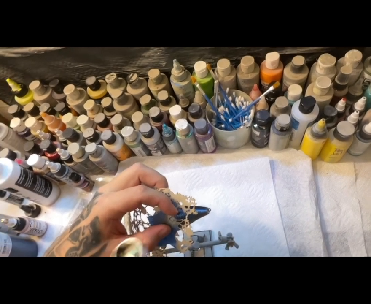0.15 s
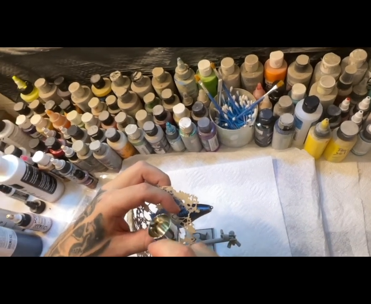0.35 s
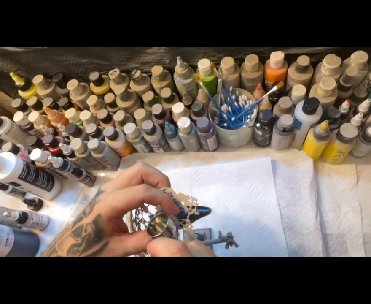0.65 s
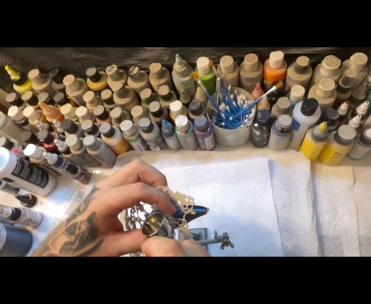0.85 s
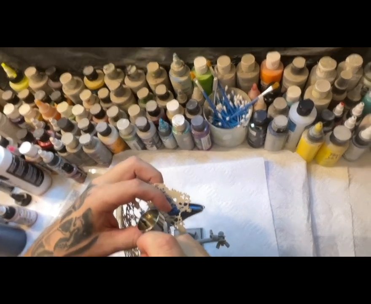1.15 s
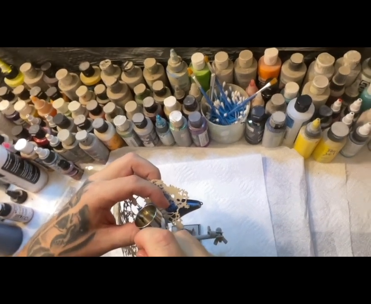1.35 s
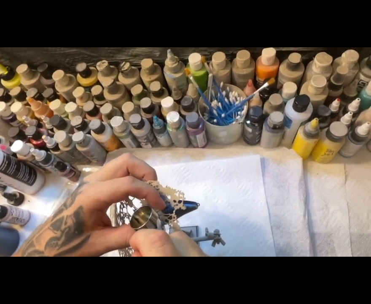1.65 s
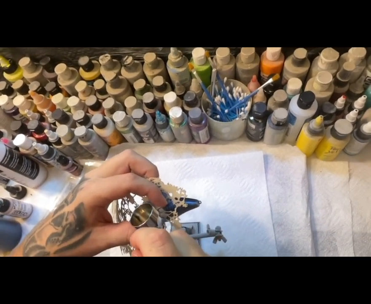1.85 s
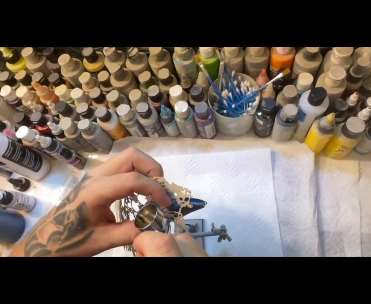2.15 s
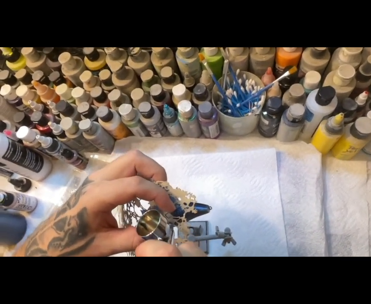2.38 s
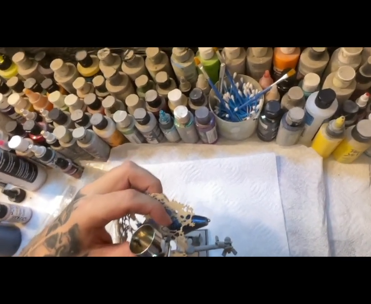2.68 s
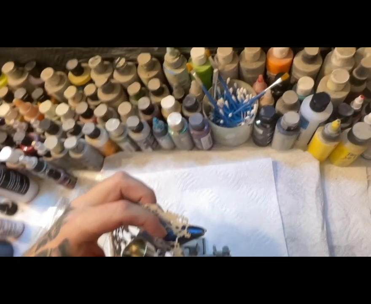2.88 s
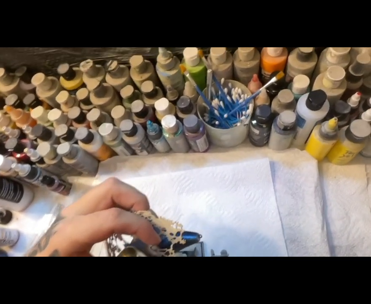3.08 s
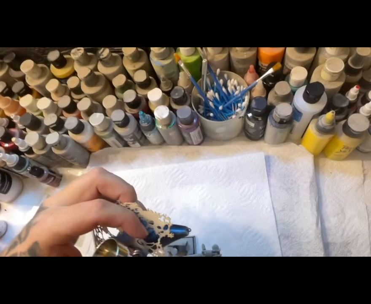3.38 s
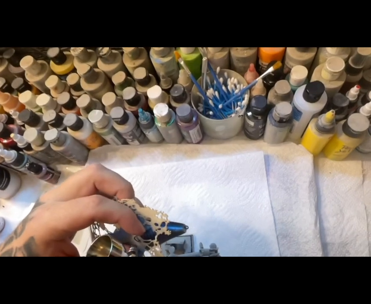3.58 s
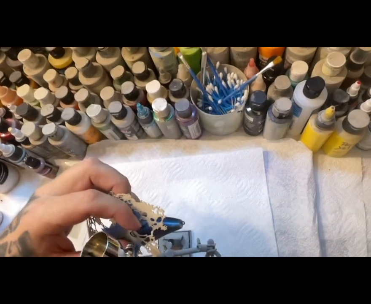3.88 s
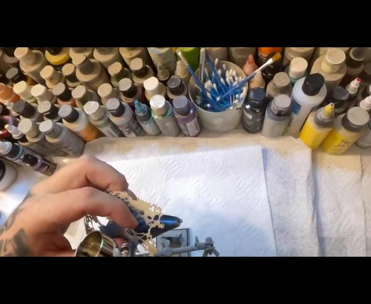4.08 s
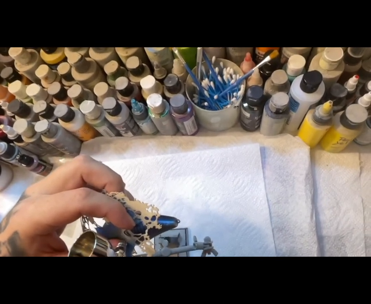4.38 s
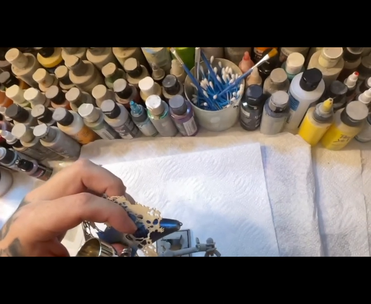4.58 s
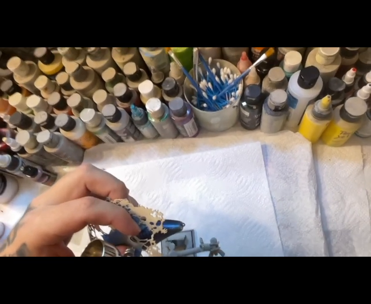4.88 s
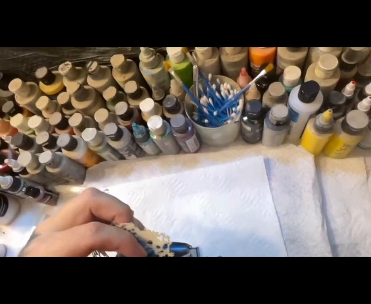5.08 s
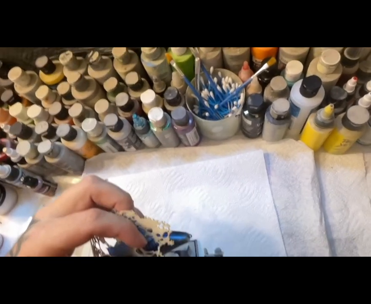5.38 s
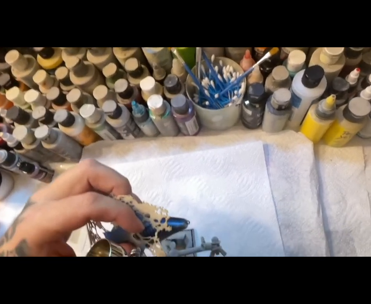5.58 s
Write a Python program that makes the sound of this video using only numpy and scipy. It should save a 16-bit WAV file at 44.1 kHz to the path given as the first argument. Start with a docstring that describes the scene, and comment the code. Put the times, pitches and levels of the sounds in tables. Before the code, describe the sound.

After faint handling sounds over a low compressor hum, an airbrush starts a steady hiss that swells against a stencil.

```python
"""An airbrush hisses close by at a hobby desk: its air valve leaks, snaps open, and the jet blows into
free air. Brought onto a small stencil held over a model, it grows much louder, whistles on the edges and
takes the colour of the gaps it blows through. Before the spray a hose slides, fingers rub, a thread of
air squeals and hands bump the desk. A compressor hums under it all, in quiet room air."""
import sys
import numpy as np
from scipy import signal
from scipy.fft import rfft, irfft, next_fast_len
from scipy.io import wavfile
from scipy.ndimage import uniform_filter1d, map_coordinates

SR = 44100
rng = np.random.default_rng(int(sys.argv[2]) if len(sys.argv) > 2 else 0)


def waveform_to_disk(signal):
    """Save audio, clipped to [-1, 1], as 16-bit WAV at the path in sys.argv[1]."""
    frames = np.transpose(np.atleast_2d(signal))
    scaled = np.clip(frames, -1, 1) * 32767
    samples = np.round(scaled).astype(np.int16)
    wavfile.write(sys.argv[1], SR, samples)


N = 253292
T = np.arange(N) / SR
FFT_SIZE = next_fast_len(N, real=True)
HZ = np.maximum(np.fft.rfftfreq(FFT_SIZE, 1 / SR), .1)
TOP_HZ = 15780


def undb(db):
    """Decibels to gain."""
    return 10 ** (np.asarray(db) / 20)


def unit(x):
    """Scale to rms 1."""
    return x / np.sqrt(np.mean(x ** 2))


def swell(peak_s, half_length_s):
    """A bell-shaped rise and fall."""
    return np.exp(-((T - peak_s) / half_length_s) ** 2)


def ramp(start_s, duration_s):
    """A smooth step from 0 to 1."""
    return np.sin(np.pi / 2 * np.clip((T - start_s) / duration_s, 0, 1)) ** 2


def drift(rate):
    """Smooth random wander with about `rate` turns a second; rms 1."""
    points = rng.standard_normal(8192)
    path = np.interp(T * 2 * rate, np.arange(len(points)), points)
    return unit(uniform_filter1d(path, max(int(SR / rate / 4), 1)))


def turbulence(colour, resonances=()):
    """Noise with a broad colour, lifted at each resonance; rms 1."""
    hz, db = np.transpose(colour)
    shape_db = np.interp(np.log(HZ), np.log(hz), db)
    for centre, width, lift in resonances:
        shape_db += lift / (1 + (2 * (HZ - centre) / width) ** 2)
    white = rfft(rng.standard_normal(FFT_SIZE))
    return unit(irfft(white * undb(shape_db) * (HZ < TOP_HZ), FFT_SIZE)[:N])


def rasp(hz, width_hz):
    """A narrow band of noise around a pitch that may glide; rms 1."""
    phase = 2 * np.pi * np.cumsum(hz * np.ones(N)) / SR
    return unit(drift(width_hz) * np.cos(phase) + drift(width_hz) * np.sin(phase))


def tilt(x, db_per_octave):
    """Lean the spectrum around 7 kHz by a moving slope, in overlapping octave bands."""
    octave = np.clip(np.log2(HZ / 7000), -2, 1)
    spectrum = rfft(x, FFT_SIZE)
    out = np.zeros(N)
    for k in range(-2, 2):
        band = irfft(spectrum * np.maximum(1 - abs(octave - k), 0), FFT_SIZE)[:N]
        out += band * undb(k * db_per_octave)
    return out


# Dark room tone: freq_hz, gain_db
ROOM_COLOUR = [(20, -25), (45, -7.5), (75, 2.5), (100, 0.5), (160, 2.5), (280, -7), (550, -10), (750, -13),
               (2000, -18.5), (4000, -25), (7500, -28.5), (10000, -35), (15500, -37)]
def room():
    """A quiet, even bed of indoor air."""
    return undb(-61 + .5 * drift(1.78)) * turbulence(ROOM_COLOUR)


# Shaft and mains tones; the pair near 120 Hz beats: pitch_hz, rms_level_db
HUM_TONES = [(58.65, -56), (117.3, -64), (120, -61), (151.5, -79), (239.6, -68.5), (2859, -82.5)]
def compressor():
    """A steady hum that wavers slightly with the load and eases off a little over time."""
    first_beat_s = .28
    ease_db = -.35 * (T - T.mean())
    hum = np.zeros(N)
    for hz, db in HUM_TONES:
        amplitude = np.sqrt(2) * undb(db + ease_db + 1.15 * drift(4))
        hum += amplitude * np.sin(2 * np.pi * hz * (T - first_beat_s))
    return hum


def hose():
    """The braid rasps, rising in pitch with the speed of the slide, then settles with a soft rub."""
    start_hz, top_hz = 3230, 4030
    hz = start_hz + (top_hz - start_hz) * ramp(0, duration_s=.23)
    rub = turbulence([(1000, -25), (2500, -10), (4000, 1), (5500, -19), (9000, -25)])
    slide = undb(-58.5) * swell(.168, .094) * rasp(hz, width_hz=380)
    return slide + undb(-72) * swell(.42, .39) * rub


# Light finger scrapes: peak_s, pitch_hz, width_hz, half_length_s, level_db
FINGER_RUBS = [(.01, 3050, 250, 0.022, -68), (.095, 2700, 300, .018, -71), (.26, 4750, 300, .07, -71),
               (.645, 7000, 1200, .03, -76), (.975, 6000, 1300, 0.049, -76), (1.02, 11500, 500, .035, -86),
               (1.06, 3200, 250, .015, -76)]
# Soft hand movements: peak_s, half_length_s, level_db
HAND_SHIFTS = [(1.457, 0.39, -63.5), (3.1, 0.3, -57), (4.28, .1, -61.5)]
# Low rush of air, for the hands and later the jet's draught: freq_hz, gain_db
RUSH_COLOUR = [(120, -6), (260, -8.5), (380, 4), (450, -1.5), (540, 3.5), (720, -6), (850, -1.5),
               (1000, -16), (1500, -14.5), (4000, -41)]
def handling():
    """Fingers rub on brush and stencil; the hands shift with a low rush."""
    rubs = sum(undb(db) * swell(s, half) * rasp(hz, width) for s, hz, width, half, db in FINGER_RUBS)
    shifting = sum(undb(db) * swell(s, half) for s, half, db in HAND_SHIFTS)
    return rubs + shifting * turbulence(RUSH_COLOUR)


def squeal():
    """A faint thread of air squeals past the shut valve, arching and wavering in pitch."""
    top_s, top_hz, waver_hz = .47, 13400, 250
    sag_hz = 20000 * np.minimum((T - top_s) ** 2, .1)
    hz = top_hz - sag_hz + waver_hz * drift(5)
    return undb(-88) * swell(.52, .27) * rasp(hz, width_hz=60)


# Soft low knocks: peak_s, pitch_hz, half_length_s, level_db
DESK_BUMPS = [(0.962, 148, 0.072, -53.5), (0.996, 195, 0.045, -58), (1.45, 84, .03, -58)]
def bumps():
    """Hands meet the desk with dull, padded thuds."""
    return sum(undb(db) * swell(s, half) * rasp(hz, width_hz=28) for s, hz, half, db in DESK_BUMPS)


def valve():
    """Share of the full air flow as the trigger is pulled: shut, leaking, then snapping open."""
    leak, leak_start_s, leak_rise_s = undb(-13.5), 1.328, .15
    leaking = leak * np.clip((T - leak_start_s) / leak_rise_s, 0, 1)
    return leaking + (1 - leak) * ramp(start_s=1.471, duration_s=.014)


# Broad colour of the hiss in free air, on the stencil's rim and on its face: freq_hz, gain_db
FREE_COLOUR = [(700, -31), (1050, -13.5), (1230, -6), (1650, -7), (2000, 1), (3200, -1.5), (5000, -0.5),
               (8000, 0.5), (9800, 0), (12500, 3.5), (15500, 3.5)]
RIM_COLOUR = [(700, -32), (1080, -24), (1220, -13.5), (1550, -18.5), (2300, -9), (3000, -8), (3700, -2.5),
              (4550, -6), (5400, -0.5), (7500, 0), (9700, -3.5), (12000, -1), (15500, -2)]
FACE_COLOUR = [(700, -32.5), (1080, -25.5), (1220, -13.5), (1550, -16.5), (2300, -9), (2950, -5.5),
               (3700, -1), (4450, -2.5), (5400, 0.5), (8500, -0.5), (10300, -2.5), (12000, -0.5),
               (15500, -2.5)]
# Resonances of nozzle, stencil gaps and cupped hand at each aim: centre_hz, width_hz, lift_db
FREE_RESONANCES = [(2000, 200, -2), (2450, 240, 0.5), (4050, 150, 2.5), (4650, 130, 1.5), (6650, 250, 2.5),
                   (7120, 180, 3), (11900, 200, -2), (14700, 400, 4.5)]
RIM_RESONANCES = [(2300, 180, 1.8), (4160, 360, 6.6), (4980, 210, 5.7), (6220, 150, 1.7), (7000, 260, 5.1),
                  (7920, 170, 5.8), (8680, 180, 4), (11100, 350, 4.6), (13000, 140, 3), (13800, 170, 4.6),
                  (14000, 180, 2.1), (15200, 170, 3)]
FACE_RESONANCES = [(1700, 79, 5.7), (2250, 140, 2.9), (3530, 73, 3.4), (4140, 250, 3.5), (4870, 130, 3.2),
                   (5675, 350, 6.2), (7480, 200, 6.7), (7830, 150, 5.2), (11300, 160, 4.5),
                   (11580, 150, 2.5), (14300, 240, 4.8), (15150, 220, 2.5)]
def jet_hiss(shares, push_db):
    """Turbulent air crossfades between the colours of the three aims; a harder push is brighter."""
    layers = [turbulence(FREE_COLOUR, FREE_RESONANCES),
              turbulence(RIM_COLOUR, RIM_RESONANCES),
              turbulence(FACE_COLOUR, FACE_RESONANCES)]
    hiss = sum(np.sqrt(share) * layer for share, layer in zip(shares, layers))
    return tilt(hiss, db_per_octave=.4 * push_db)


def desk_echoes(x, echo_db=-17, far_s=.016, sway_s=.00002, count=8):
    """Short echoes off desk and paint bottles comb the sound, shifting as the hands sway; rms 1."""
    oversampled = signal.resample_poly(x, 4, 1)
    for lag_s in np.linspace(far_s / count, far_s, count) * rng.uniform(.8, 1.2, count):
        position = (T - lag_s - sway_s * drift(1.3)) * SR * 4
        x = x + undb(echo_db) * map_coordinates(oversampled, [position], order=1)
    return unit(x)


# Whistles riding on the hiss: peak_s, pitch_hz, width_hz, half_length_s, level_vs_hiss_db
EDGE_TONES = [(1.54, 4710, 85, 0.4, -16.5), (2.353, 4110, 60.6, .25, -15), (2.502, 7240, 100.4, .14, -13),
              (2.703, 4290, 50, 0.11, -15), (3.05, 4980, 80, 0.72, -19.5), (3.2, 7060, 119, .22, -19),
              (3.3, 13300, 131, .25, -14), (3.618, 6043, 159.3, 0.5, -12), (4.4, 7320, 110.8, 0.53, -15.5),
              (4.907, 4060, 170.5, 0.1, -12.5), (5.2, 5510, 260, 0.21, -11)]
def whistles():
    """Breathy tones swell and fade as the jet catches an edge."""
    return sum(undb(db) * swell(s, half) * rasp(hz, width) for s, hz, width, half, db in EDGE_TONES)


# The jet catches the rim, settles on it, then crosses to the face: start_s, duration_s, aim_step
AIM_MOVES = [(2.694, .09, 0.73), (2.8, 0.45, 0.3), (3.617, 0.39, .98)]
# Balance at each aim for an easy pull of the trigger: hiss_level_db, draught_level_db
EASY_PULL = [(-35.5, -60), (-25, -63.5), (-24.5, -63)]
# How hard the jet blows, in free air and then on the stencil: time_s, hiss_level_db
FREE_SPRAY = [(1.5, -35.5), (1.834, -36), (2.136, -39.5), (2.44, -37.5), (2.68, -34)]
STENCIL_SPRAY = [(2.8, -31), (3.31, -23.5), (3.6, -22.5), (3.97, -25), (4.46, -23.5), (4.61, -25.5),
                 (4.95, -24), (5.4, -25.5), (5.62, -27), (5.74, -26.5)]
def airbrush():
    """The jet hisses in free air, then on the stencil; its draught rushes over hand and paper."""
    hiss_db = np.interp(T, *np.vstack([FREE_SPRAY, STENCIL_SPRAY]).T)
    travel = sum(step * ramp(s, duration) for s, duration, step in AIM_MOVES)
    aim = np.clip(travel, 0, 2)  # 0 free air, 1 rim, 2 face
    shares = np.array([np.maximum(1 - abs(aim - k), 0) for k in range(3)])  # of power, per aim
    easy_hiss_db, easy_draught_db = np.transpose(EASY_PULL) @ shares
    push_db = hiss_db - easy_hiss_db
    jet = desk_echoes(jet_hiss(shares, push_db)) + whistles()
    flutter_db = .34 * drift(30)  # paint leaves the needle a little unevenly
    draught = undb(easy_draught_db + .7 * push_db) * turbulence(RUSH_COLOUR)
    return valve() * (undb(hiss_db + flutter_db) * jet + draught)


def scene():
    """The airbrush up front, over small desk sounds and hum, the same in both channels."""
    mono = airbrush() + hose() + handling() + squeal() + compressor() + bumps() + room()
    return np.array([mono, mono])


def record(dry):
    """A steep low-pass trims the very top."""
    return signal.sosfilt(signal.ellip(12, .1, 80, TOP_HZ, fs=SR, output="sos"), dry)


dry = scene()
out = record(dry)
waveform_to_disk(out)
```